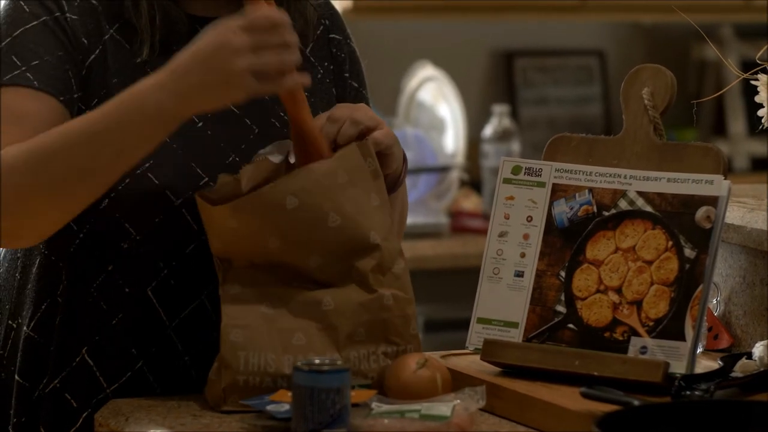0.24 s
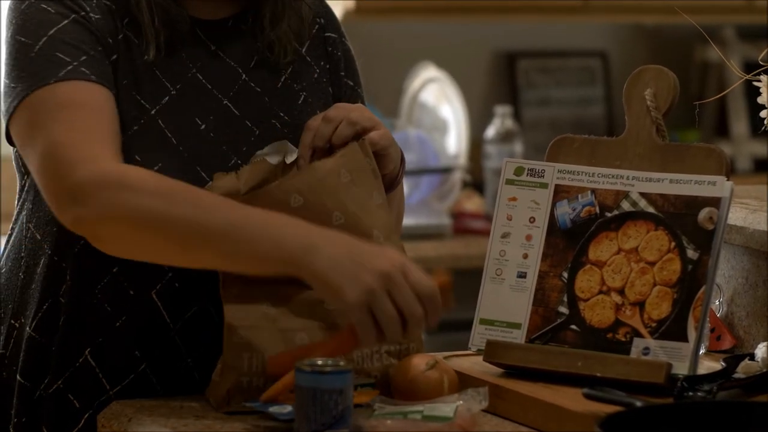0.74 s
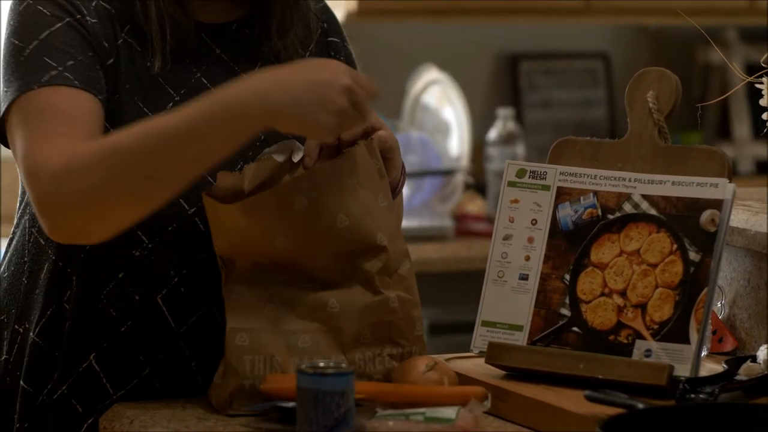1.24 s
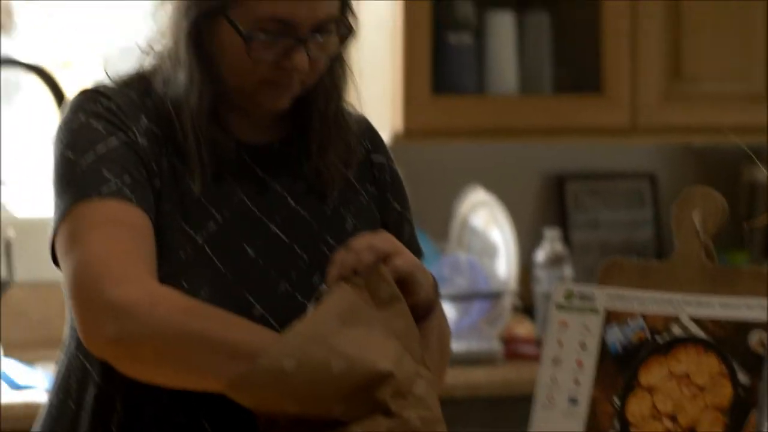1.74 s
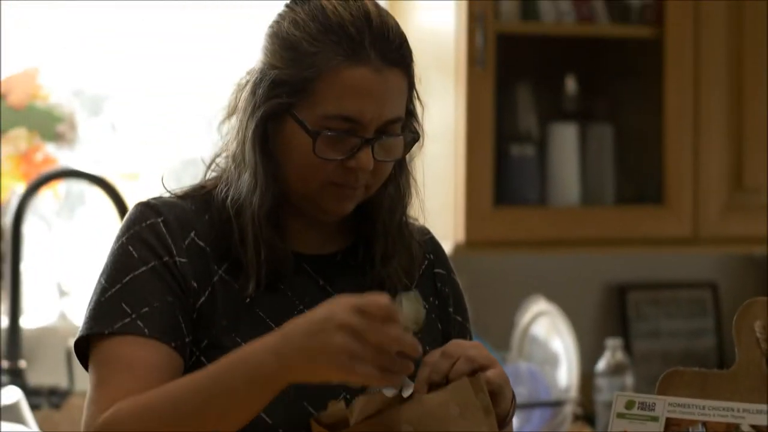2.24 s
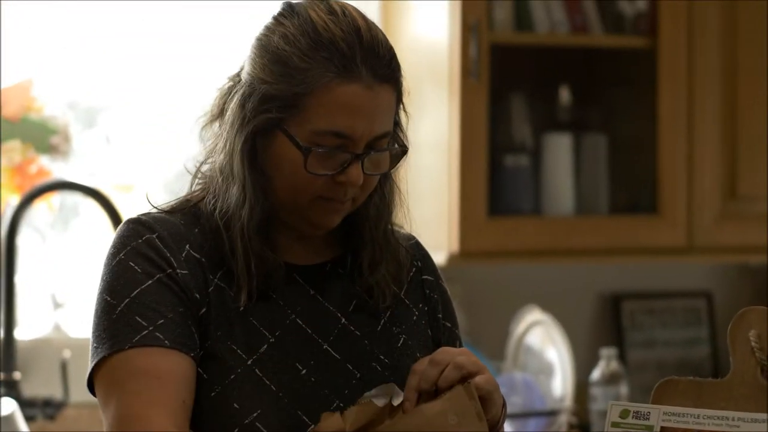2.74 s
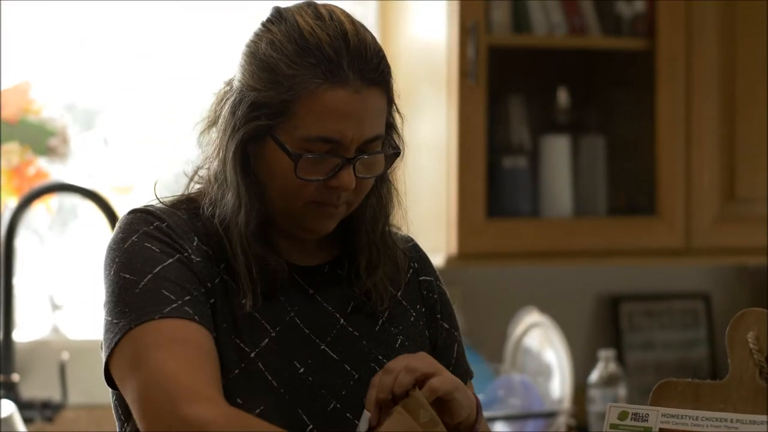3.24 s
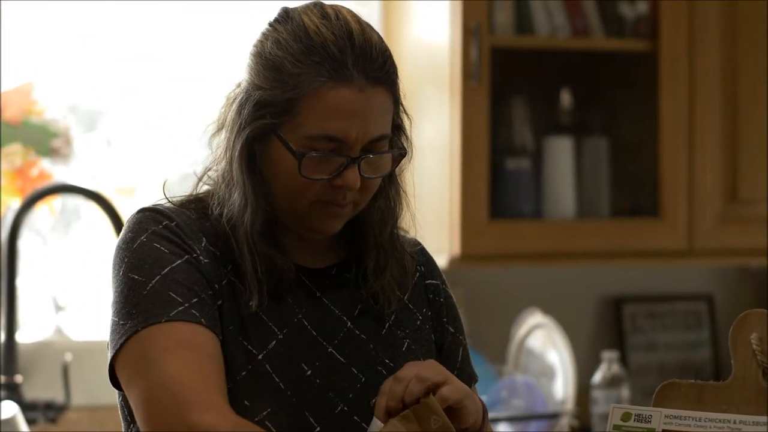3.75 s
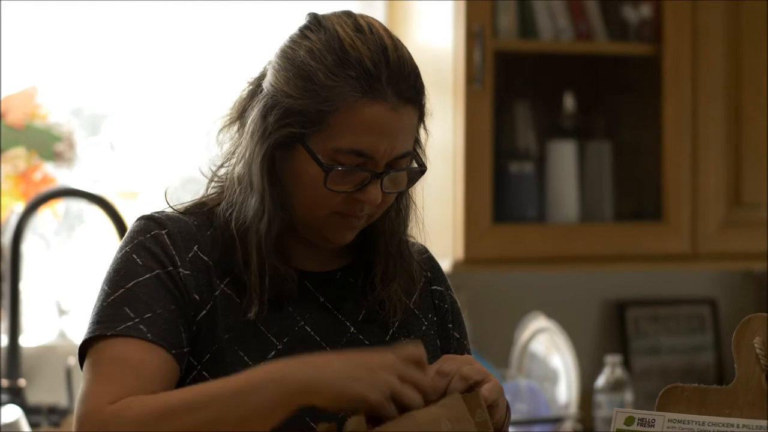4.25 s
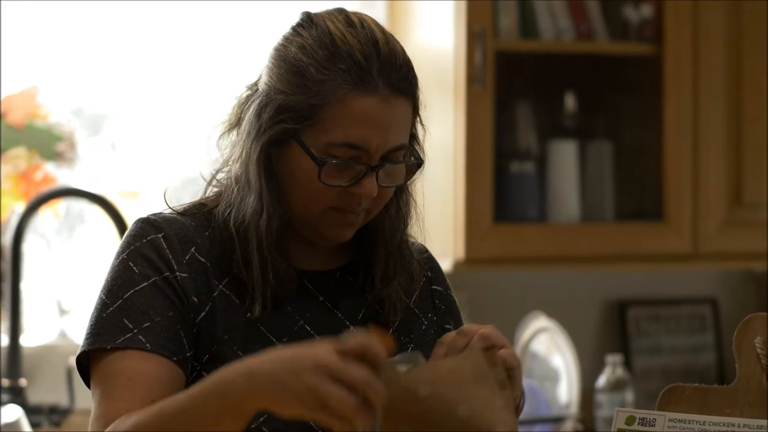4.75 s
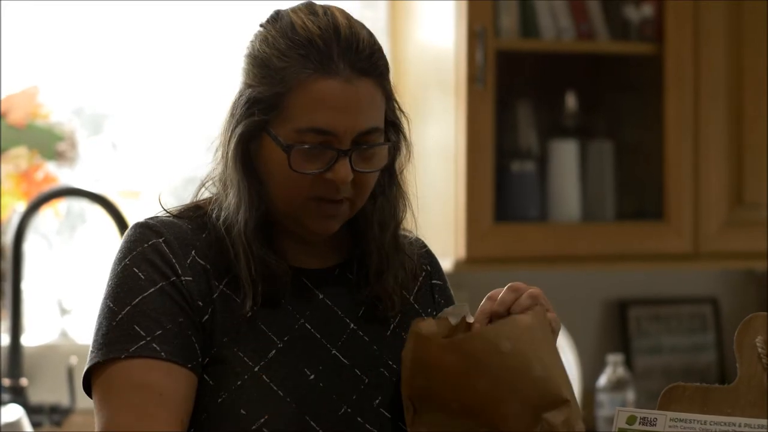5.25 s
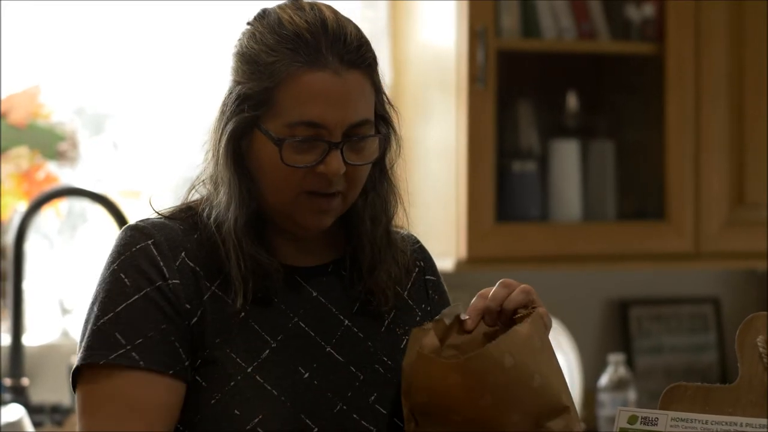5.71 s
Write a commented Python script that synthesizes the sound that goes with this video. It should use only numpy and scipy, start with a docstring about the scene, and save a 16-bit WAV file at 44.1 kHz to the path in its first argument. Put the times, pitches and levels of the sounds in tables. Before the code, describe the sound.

Close-up rummaging in a brown paper bag: short scrapes, a solid woody carrot knock with a quick bounce, then loud irregular crackling and snapping paper. Later the movement eases, leaving small crinkles and a thin bright packet crackle. The kitchen rings around it; low handling thumps, a deep wavering rumble and quiet appliance hum sit underneath.

```python
"""A lively kitchen, where hands rummage in a brown paper bag for a carrot and a small plastic packet.
Paper is shaped noise that slides and buckles in strokes; its creases snap as short noise bursts.
The carrot knocks on the counter and the packet's film flicks, both as rough contacts driving resonances;
between knocks the carrot rolls or slides, made as one more stroke of the same noise as the paper.
The microphone mount rings from two bumps and wobbles as a wavering low sine, over dull air noise and hum."""
import sys
import numpy as np
from scipy import signal
from scipy.fft import rfft, irfft
from scipy.io import wavfile

SR = 44100
rng = np.random.default_rng(int(sys.argv[2]) if len(sys.argv) > 2 else 0)


def generate_wav(sig):
    """Save sig (samples, or channels by samples) to the path in sys.argv[1] as 16-bit PCM at SR."""
    pcm = np.round(np.clip(np.atleast_2d(sig).T, -1, 1) * 32767).astype(np.int16)
    wavfile.write(sys.argv[1], SR, pcm)


N = 263673
TIME = np.arange(N) / SR

# Strokes of rubbing: hands on the paper, and at 0.864 s the carrot rolling or sliding.
# Each row: start in seconds, swell in seconds, hold in seconds, nominal crease level in dB,
# bag walls in dB re creases, fine crackle in dB re creases.
STROKES = [(0.0, 0.0017, 0.0067, -33.5, 4, -11.5), (0.052, 0.048, .07, -40, -1.5, -26),
           (0.133, 0.041, 0.028, -40, 9, -10), (0.864, 0.018, 0.023, -43.5, 7.5, -14.5),
           (0.987, 0.018, 0.017, -44, -3, -12), (1.225, 0.0077, .04, -38, 5.5, -11),
           (1.285, 0.049, 0.065, -33.5, -1, -11), (1.398, .03, 0.5, -38.5, -1, -12.5),
           (1.806, 0.084, 0.055, -31.5, -2, -13.5), (1.964, 0.017, 0.17, -44, -6, -10),
           (2.255, 0.017, 0.12, -39.5, -2.5, -4), (2.587, 0.012, .11, -38.5, -2, -8),
           (2.829, .055, 0.031, -31.5, -3, -11), (2.958, 0.047, 0.21, -32.5, 2.5, -11.5),
           (3.204, .03, 0.13, -41, 4, -17), (3.317, 0.057, 0.021, -28, -8.5, -15.5),
           (3.467, 0.029, 0.097, -36, -5, -15), (3.723, 0.12, 0.091, -27, -0.5, -17.5),
           (3.916, 0.026, 0.18, -33.5, 3.5, -10), (4.47, .17, 0.29, -48.5, 2, -9.5),
           (5.081, 0.068, 0.2, -48, 0.5, -5.5), (5.901, 0.061, .03, -41, 2, -7.5)]
SAG_DB_PER_S, RELEASE_DB_PER_S = 8.5, 200   # a stroke eases while it lasts, then comes to rest

# Colour of the paper. Each row: frequency in Hz, relative spectral density in dB.
PAPER_COLOUR = [(190, -11), (300, -1.5), (550, -0.5), (800, -2.5), (1050, -2), (2000, -5), (3200, -8.5),
                (4800, -14), (6500, -16.5), (8000, -26), (9500, -28), (12500, -33.5), (15500, -39)]
# Centres of the three zones of paper sound: bag walls, creases, fine crackle. Each entry: frequency in Hz.
ZONE_CENTRES_HZ = [550, 3000, 10500]
# Borders between those zones. Each entry: frequency in Hz.
ZONE_BORDERS_HZ = [1200, 7000]

# Loud creases snapping. Each row: time in seconds, nominal peak in dB, fine crackle in dB re that peak,
# panel pitch in Hz.
CREASE_SNAPS = [(0.237, -36, -2, 7600), (1.237, -20.5, -10, 7300), (1.2709, -15.5, -13.5, 8900),
                (1.329, -25.5, -17, 650), (1.3991, -16.5, -16, 2430), (1.4051, -15.5, -11, 6700),
                (1.634, -27, -9, 2420), (1.7525, -29.5, -1, 1400), (1.822, -27, -3, 1200),
                (1.85, -21, -19, 1500), (1.891, -23, -23, 1290), (1.908, -22.5, -12, 2500),
                (2.049, -25, -26, 1000), (2.158, -25.5, -11, 8650), (2.2683, -31.5, -4, 4940),
                (2.3556, -18, -4, 3020), (2.602, -26.5, -11, 1140), (2.71, -30, -11, 1380),
                (2.8927, -17, -11, 6200), (2.944, -28, -22, 556), (3.047, -18.5, -16, 1900),
                (3.0986, -18, -34, 1390), (3.12, -23.5, -25, 690), (3.1603, -20, -2, 2570),
                (3.365, -27.5, -11, 1600), (3.52, -31, -9, 3000), (3.68, -27.5, -24, 1280),
                (3.727, -21.5, -59, 1150), (3.834, -31, -10, 2220), (3.937, -22.5, -16, 700),
                (4.029, -21.5, -26, 915), (4.043, -28, -15, 810), (4.111, -28.5, -5, 1020),
                (4.77, -33.5, -5, 1690), (5.021, -35.5, -16, 1270), (5.285, -38.5, -4, 9800),
                (5.326, -31, -7, 400), (5.8758, -34, -11, 870), (5.9372, -28, -27, 3050)]
SNAP_PANEL_HZ, SNAP_DECAY_S = 2000, 0.0054   # a middling panel and how fast its snap dies
SNAP_WALLS_DB_PER_OCTAVE = -2.5   # smaller, higher panels shake the bag walls less
CRINKLES_PER_S, CRINKLE_DB, CRINKLE_SPREAD_DB = 26, 3, 0.5   # lesser folds; level re the stroke
# Lowest and highest panel pitch of the lesser folds. Each entry: frequency in Hz.
CRINKLE_PITCH_HZ = [805, 7000]
# Resonances of the bag. Each row: frequency in Hz, width in Hz, gain in dB.
BAG_MODES = [(254, 80, -8), (329, 29, 2.5), (448, 3.6, 4), (578, 130, -4.5), (973, 73, -5.5)]

# Carrot meeting the counter. Each row: time in seconds, strength in dB, contact hardness (lowpass) in Hz.
CARROT_KNOCKS = [(0.6807, -16, 3000), (0.6868, -1, 5300), (0.7111, -8, 4440), (0.8829, -26, 7000),
                 (0.8917, -20, 8000)]
# Resonances of counter and carrot. Each row: frequency in Hz, width in Hz, gain in dB.
COUNTER_MODES = [(338, 19, 13), (630, 330, 5), (750, 34, 7.5), (1060, 210, 1), (1300, 700, -12),
                 (2100, 900, -27), (3480, 600, -20), (6360, 1100, -38)]
# A stiff plastic packet flexing. Each row: time in seconds, strength in dB.
PACKET_FLICKS = [(5.139, -33), (5.169, -18.5), (5.175, -23), (5.183, -22), (5.197, -28), (5.212, -30)]
# Resonances of the packet's film. Each row: frequency in Hz, width in Hz, gain in dB.
FILM_MODES = [(4000, 1100, -7), (5530, 300, -3), (6260, 200, 1), (6950, 330, -1), (7400, 310, 1.5),
              (8250, 200, -1), (11300, 2000, -8.5), (13700, 700, -17)]

# Bumps on the microphone mount. Each row: time in seconds, strength in dB.
MOUNT_BUMPS = [(1.2125, -21.5), (2.0196, -19.5)]
# Ringing modes of the mount. Each row: frequency in Hz, gain in dB, 60 dB decay time in seconds.
MOUNT_MODES = [(61.2, 4, 0.39), (108, 10.5, 0.045), (200, 0, 0.27)]
WOBBLE_HZ, WOBBLE_DB = 25.85, -34.5   # centre of the sway and its resting level
SWING_START_S, SWING_END_S = 1.2, 2.74   # the mount is swung round
SWING_DB, SWING_EASE_S = 7.5, 0.052   # how much the wobble grows, and how quickly it starts and stops

# Colour of the air noise. Each row: frequency in Hz, relative spectral density in dB.
AIR_COLOUR = [(20, -12), (40, -1), (70, 2), (100, 0), (150, -7.5), (280, -8), (450, -15), (800, -21.5),
              (1500, -26), (3000, -32.5), (6500, -41), (9000, -46), (16000, -50)]
AIR_DB = -33.5   # rms level
# Appliance hum. Each row: frequency in Hz, rms level in dB.
HUM_TONES = [(60, -44.5), (323, -65.5)]
# Decay of the kitchen. Each row: frequency in Hz, 60 dB decay time in seconds.
KITCHEN_DECAY = [(200, 0.81), (550, 0.68), (1500, 0.61), (4000, 0.56), (8000, 0.52), (15000, 0.23)]
PAPER_ROOM_DB = -3.5   # send of paper and strokes to the room
CUTOFF_HZ = 15750


def from_db(db):
    """Decibels to gain."""
    return 10 ** (np.asarray(db) / 20)


def rms_one(x):
    """Scale to unit rms."""
    return x / np.sqrt(np.mean(x ** 2) + 1e-20)


def at_hz(points, hz):
    """Read a table on a log-frequency axis."""
    points = np.array(points)
    return np.interp(np.log(hz), np.log(points[:, 0]), points[:, 1])


def drift(rate_hz):
    """Slow random motion with unit rms: twice-smoothed noise, made at every 40th sample."""
    r = np.exp(-80 * np.pi * rate_hz / SR)
    noise = rng.standard_normal(N // 40 + 2002)
    slow = signal.lfilter([1], [1, -2 * r, r * r], noise)[2000:]   # skip the filter's start-up
    return np.interp(np.arange(N) / 40, np.arange(len(slow)), rms_one(slow))


def butter(x, hz, kind, order=2):
    """Causal Butterworth filter."""
    return signal.sosfilt(signal.butter(order, hz, kind, fs=SR, output="sos"), x + 1e-18)


def ring(x, hz, t60):
    """A unit click sets a decaying sine of height 1 ringing."""
    r, w = np.exp(-np.log(1000) / (t60 * SR)), 2 * np.pi * hz / SR
    return signal.lfilter([0, np.sin(w)], [1, -2 * r * np.cos(w), r * r], x + 1e-18)


def resonance(x, hz, width):
    """Band resonance with a gain of about 1 on top."""
    r = np.exp(-np.pi * width / SR)
    feedback = [1, -2 * r * np.cos(2 * np.pi * hz / SR), r * r]
    return signal.lfilter(np.array([1, 0, -1]) * (1 - r * r) / 2, feedback, x)


def fade(x, seconds):
    """Every impulse dies away exponentially from its own height."""
    return signal.lfilter([1], [1, -np.exp(-1 / (seconds * SR))], x + 1e-18)


def clicks(times, sizes):
    """Impulses at the given times."""
    return np.bincount((np.asarray(times) * SR).astype(int), sizes, N)[:N]


def effort_db():
    """Levels of the three zones, walls to crackle: each stroke swells, eases slowly and is released."""
    power = 1e-12
    for start, swell, hold, db, walls, crackle in STROKES:
        age = TIME - start
        rise = np.clip(age / swell, 0, 1) ** 2
        sag_db = SAG_DB_PER_S * np.clip(age - swell, 0, hold)
        release_db = RELEASE_DB_PER_S * np.clip(age - swell - hold, 0, 1)
        stroke = rise * from_db(-sag_db - release_db)
        zone_gain = from_db(db + np.array([[walls], [0], [crackle]]))
        power = power + zone_gain ** 2 * stroke ** 2
    return 10 * np.log10(power)


def paper_bands():
    """Split paper sound into bands: edges, centre, share (dB) of its zone's power, weights of three zones."""
    edges = np.geomspace(200, 16500, 17)
    centres = np.sqrt(edges[1:] * edges[:-1])
    power = from_db(at_hz(PAPER_COLOUR, centres)) ** 2 * np.diff(edges)
    zone_db = 10 * np.log10(np.bincount(np.searchsorted(ZONE_BORDERS_HZ, centres), power))
    # neighbouring zones crossfade on a log-frequency axis
    log_zones = np.log(ZONE_CENTRES_HZ)
    weights = np.transpose([np.interp(np.log(centres), log_zones, row) for row in np.eye(len(log_zones))])
    share_db = 10 * np.log10(power) - weights @ zone_db
    return zip(zip(edges, edges[1:]), centres, share_db, weights)


def rustle(effort, buckles_per_s=280, size_db=3.5, colour_db=3.5, ring_s=0.0025, level_db=-1.0):
    """Strokes as many tiny buckling bursts of uneven size and colour, over the hiss of sliding."""
    slide_share = 0.3   # of the power
    white, out = rng.standard_normal((2, N)), 0
    buckles = np.flatnonzero(rng.random(N) < buckles_per_s / SR)
    sizes_db = size_db * np.minimum(rng.exponential(1, len(buckles)), 3.5)
    for k, (band, hz, share_db, weights) in enumerate(paper_bands()):
        colours_db = colour_db * rng.standard_normal(len(buckles))
        energy = np.zeros(N)
        energy[buckles] = from_db(sizes_db + colours_db) ** 2
        energy = fade(energy, ring_s * (3000 / hz) ** 0.5)   # large, low panels ring longer
        envelope = np.sqrt(slide_share + (1 - slide_share) * energy / energy.mean())
        grains = rms_one(butter(white[k % 2] * envelope, band, "band"))   # neighbours use separate noise
        out = out + from_db(level_db + share_db + weights @ effort) * grains
    return out


def crinkles(effort):
    """Lesser snaps at random moments, as strong and as bright as the stroke under way."""
    when, size, pitch = rng.random((int(CRINKLES_PER_S * N / SR), 3)).T
    s = np.interp(when, [0, 1], [0.02, TIME[-1]])
    _, creases, crackle = effort[:, (s * SR).astype(int)]
    peak = creases + CRINKLE_DB + CRINKLE_SPREAD_DB * (2 * size - 1)
    low, high = CRINKLE_PITCH_HZ
    return np.column_stack([s, peak, crackle - creases, low * (high / low) ** pitch])


def snaps(rows, level_db=-1.0, panel_db=9.5, panel_octaves=0.47, walls_db=-2.0, crackle_db=-4.0,
          creep_s=0.0016, creep_db=-3.0):
    """A crease strains, then flips through: a sharp burst, strongest near the pitch of its panel."""
    s, peak, crackle, pitch = np.transpose(rows)
    walls = SNAP_WALLS_DB_PER_OCTAVE * np.log2(pitch / SNAP_PANEL_HZ)
    zones = peak + np.array([walls + walls_db, np.zeros(len(s)), crackle + crackle_db])
    age = np.arange(-SR // 80, SR // 30) / SR   # from before the flip to after it
    strain = from_db(creep_db) * np.exp(-np.abs(age) / creep_s)
    release = np.exp(-np.abs(age) / SNAP_DECAY_S)
    bursts = np.where(age < 0, strain, release) * rng.standard_normal((2, len(s), len(age)))
    times = (np.round(s * SR)[:, None] + 0.5) / SR + age
    out = 0
    for k, (band, hz, share_db, weights) in enumerate(paper_bands()):
        near = np.exp(-0.5 * (np.log2(hz / pitch) / panel_octaves) ** 2)
        gain = from_db(level_db + share_db + weights @ zones + panel_db * (near - 0.5))
        gain = gain * np.sqrt(SR / 2 / np.diff(band))   # make up for the power the band filter removes
        sources = clicks(times.ravel(), (gain[:, None] * bursts[k % 2]).ravel())
        out = out + butter(sources, band, "band")
    return out


def bag(paper, hollow_db=0.0, walls_db=-2.0):
    """The air inside the bag rings along with its walls."""
    hollow = sum(from_db(db + hollow_db) * resonance(paper, hz, width) for hz, width, db in BAG_MODES)
    wall_change = (from_db(walls_db) - 1) * butter(paper, 1150, "low", order=1)   # a low shelf
    return paper + hollow + wall_change


def struck(times, db, contact_s, modes):
    """Rough contacts, each dying in a few milliseconds, drive the resonances of an object."""
    force = fade(clicks(times, from_db(db)), contact_s)
    out = 0
    for hz, width, mode_db in modes:
        out = out + from_db(mode_db) * resonance(force * rng.standard_normal(N), hz, width)
    return out


def carrot(contact_s=0.0027, level_db=0.0):
    """The carrot lands, bounces and settles; a lower contact hardness makes a duller knock."""
    out = 0
    for s, db, hardness_hz in CARROT_KNOCKS:
        out = out + butter(struck([s], [db + level_db], contact_s, COUNTER_MODES), hardness_hz, "low")
    return out


def packet(contact_s=0.0052, level_db=0.0):
    """Plastic film flicks through with a thin, bright crackle."""
    s, db = np.transpose(PACKET_FLICKS)
    return struck(s, db + level_db, contact_s, FILM_MODES)


def mount(soft_hz=320, waver_db=3.0, wobble_width_hz=2.72):
    """Soft bumps ring the microphone mount, which also sways at a low pitch, most while it is swung."""
    s, db = np.transpose(MOUNT_BUMPS)
    push = butter(clicks(s, -from_db(db)), soft_hz, "low")
    thuds = sum(from_db(mode_db) * ring(push, hz, t60) for hz, mode_db, t60 in MOUNT_MODES)
    phase = 2 * np.pi * np.cumsum(WOBBLE_HZ + wobble_width_hz * drift(3.55)) / SR
    inside_s = np.minimum(TIME - SWING_START_S, SWING_END_S - TIME)
    swung = np.clip(inside_s / SWING_EASE_S + 1, 0, 1)
    sway_db = WOBBLE_DB + SWING_DB * swung + waver_db * drift(4.5)
    return thuds + from_db(sway_db) * np.sqrt(2) * np.sin(phase)


def room_noise():
    """Steady dull air noise, shaped in the spectrum, and appliance hum made of sines."""
    hz = np.maximum(np.fft.rfftfreq(N, 1 / SR), 1)
    air = rms_one(irfft(rfft(rng.standard_normal(N)) * from_db(at_hz(AIR_COLOUR, hz)), N))
    hum = 0
    for tone_hz, db in HUM_TONES:
        hum = hum + from_db(db) * np.sqrt(2) * np.sin(2 * np.pi * tone_hz * (TIME + rng.random()))
    return from_db(AIR_DB) * air + hum


def kitchen(x, first_echo_s=0.0059, build_s=0.00067, dull_hz=11000):
    """Echoes off cabinets and walls thicken into a noise tail that dies faster in the treble."""
    age = TIME[:SR * 3 // 4]
    edges = np.geomspace(100, 17000, 12)
    tail = 0
    for low, high in zip(edges, edges[1:]):
        decay = np.exp(-np.log(1000) * age / at_hz(KITCHEN_DECAY, np.sqrt(low * high)))
        shape = decay * (1 - np.exp(-np.maximum(age - first_echo_s, 0) / build_s))
        echoes = butter(rng.standard_normal(len(age)), [low, high], "band")
        tail = tail + echoes * shape / np.linalg.norm(shape)
    return signal.fftconvolve(x, butter(tail, dull_hz, "low", order=1))[:N]


def scene(carrot_room_db=-1.0, packet_room_db=-3.0, moves_per_s=3.0):
    """Bag, carrot and packet sound in the room; the mount reaches the microphone directly."""
    effort = effort_db()
    creases = snaps(np.vstack([CREASE_SNAPS, crinkles(effort)]))
    paper = bag(rustle(effort) + creases)   # the carrot's roll or slide is among the strokes
    knocks, film = carrot(), packet()
    sent = from_db(PAPER_ROOM_DB) * paper + from_db(carrot_room_db) * knocks + from_db(packet_room_db) * film
    # as the hands and what they hold turn, sound reaches the walls by other paths: the whole send drifts
    # between two tails
    facing = np.pi * drift(moves_per_s)
    room = kitchen(sent * np.cos(facing)) + kitchen(sent * np.sin(facing))
    return (paper + knocks + film + room + mount() + room_noise())[None]


def record(dry):
    """A steep elliptic lowpass cuts the top."""
    return signal.sosfilt(signal.ellip(12, 0.1, 90, CUTOFF_HZ, fs=SR, output="sos"), dry)


dry = scene()
out = record(dry)
generate_wav(out)
```